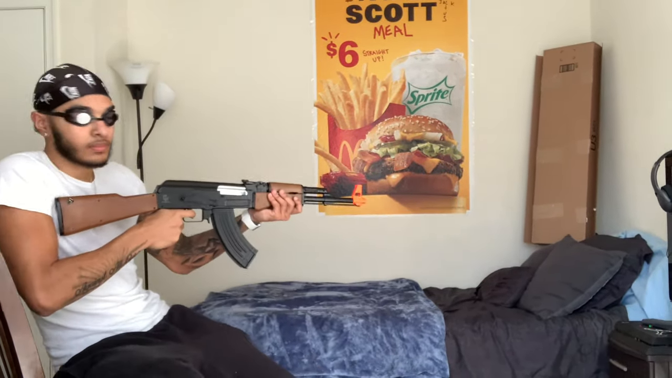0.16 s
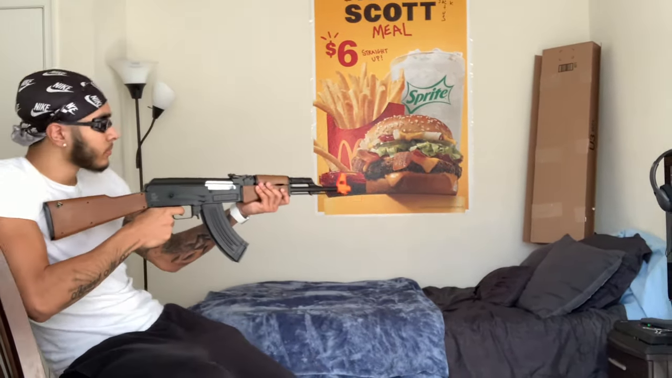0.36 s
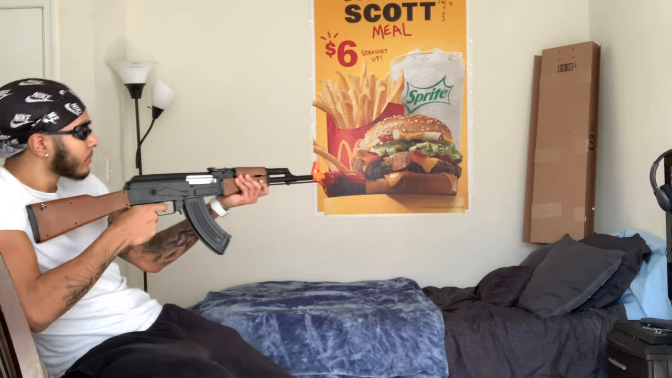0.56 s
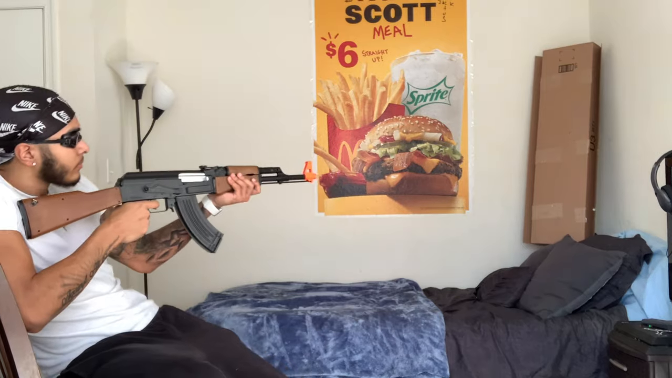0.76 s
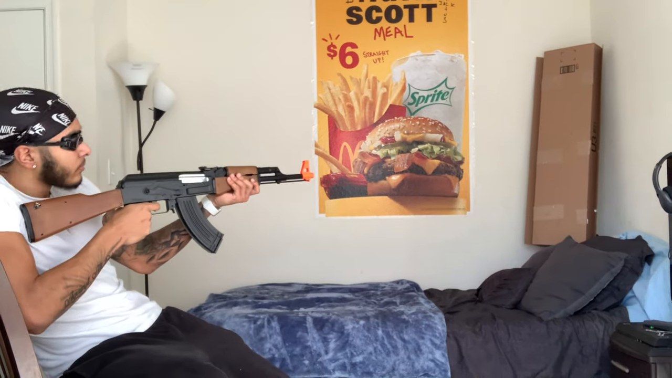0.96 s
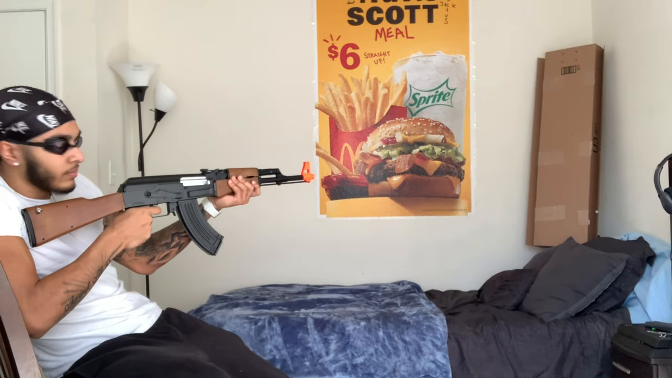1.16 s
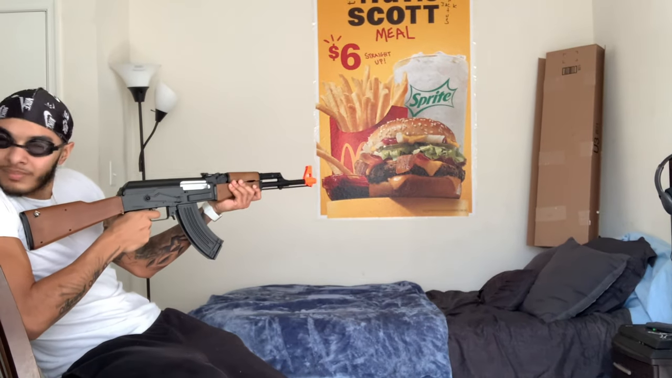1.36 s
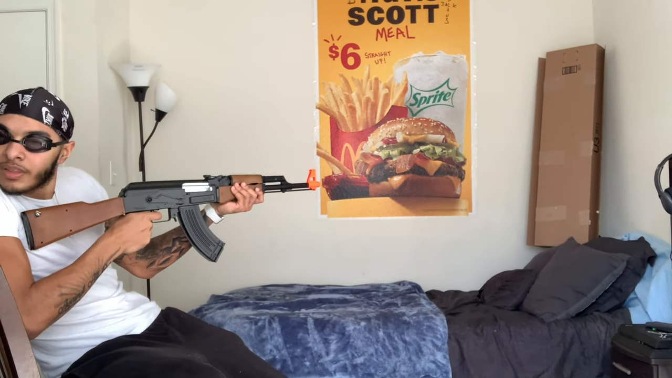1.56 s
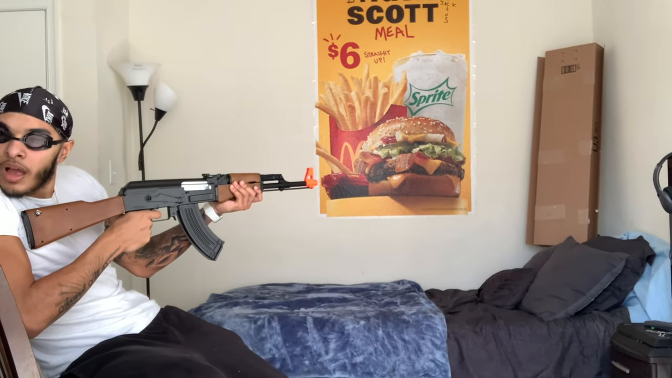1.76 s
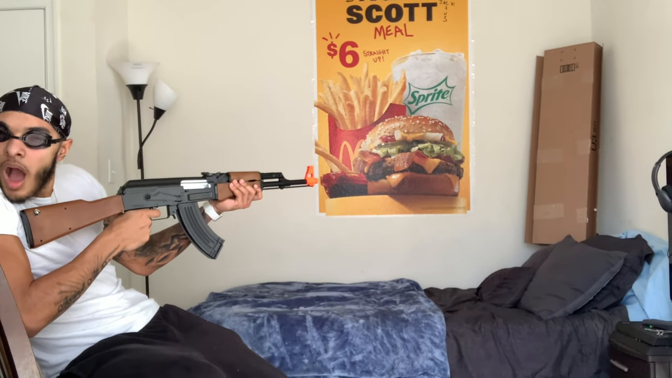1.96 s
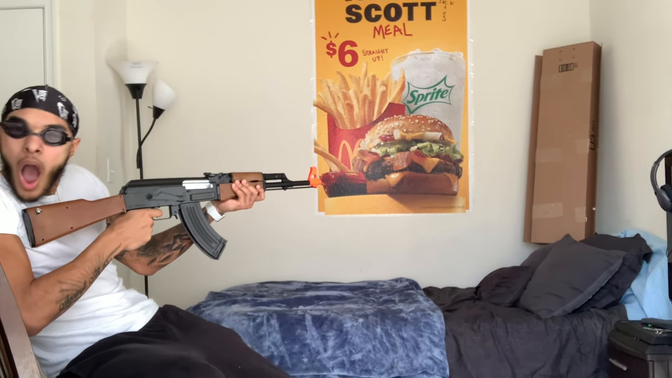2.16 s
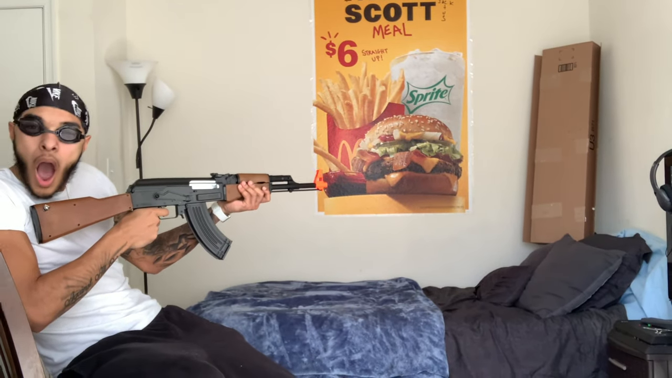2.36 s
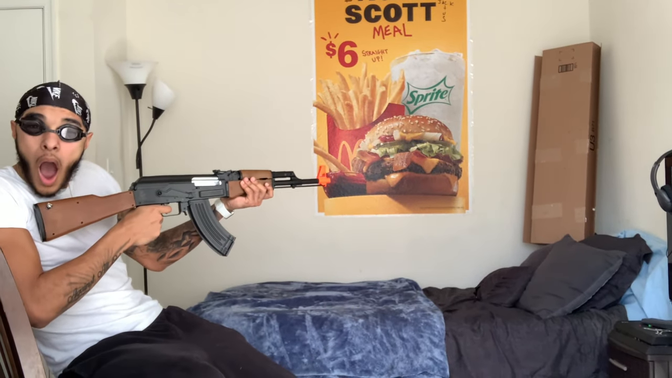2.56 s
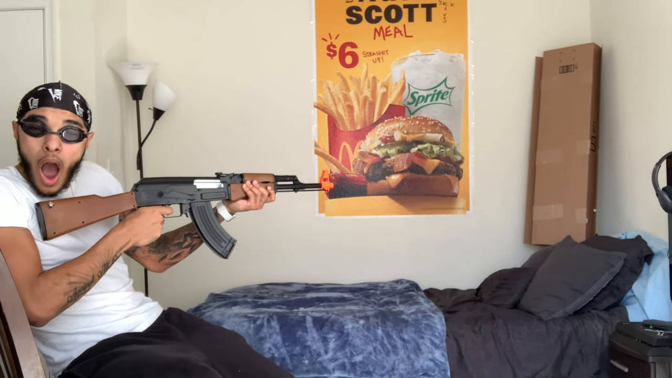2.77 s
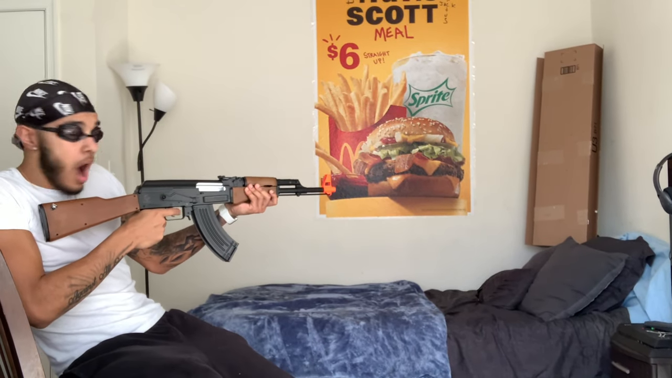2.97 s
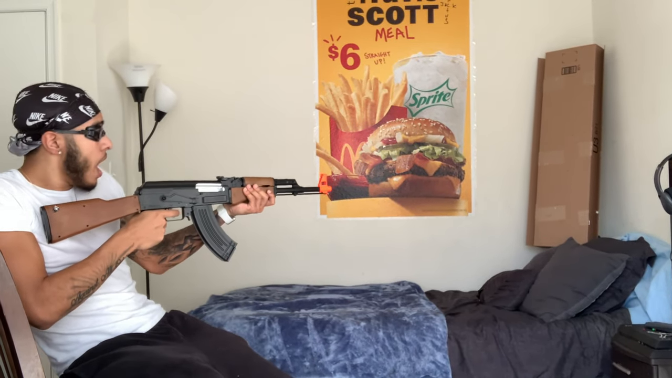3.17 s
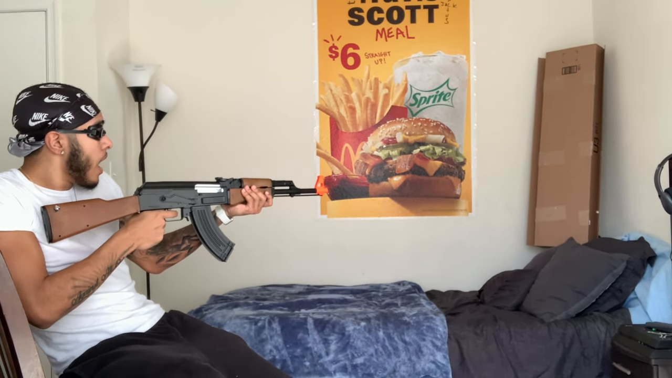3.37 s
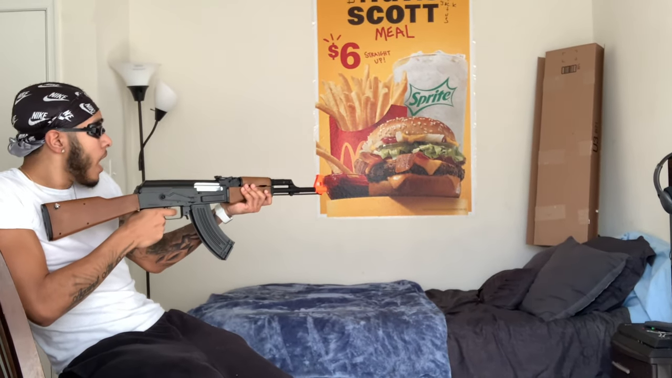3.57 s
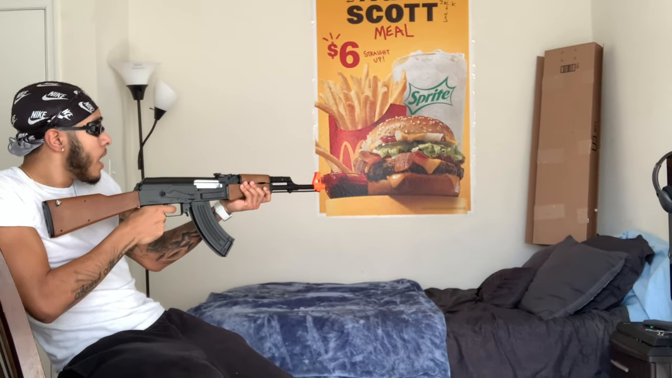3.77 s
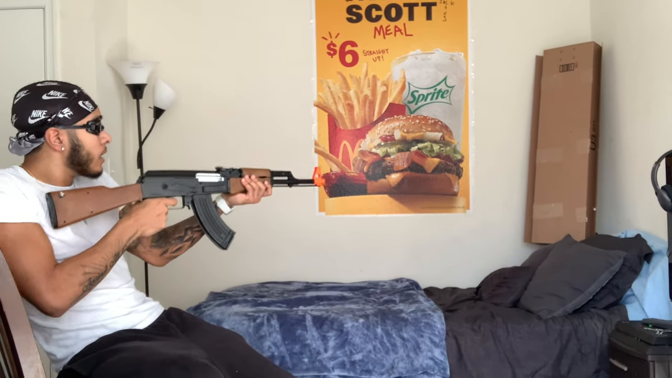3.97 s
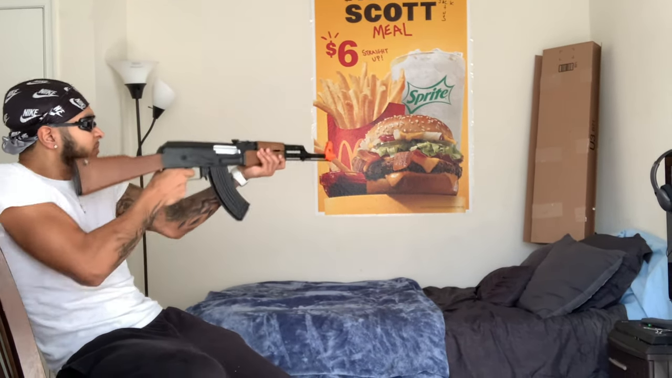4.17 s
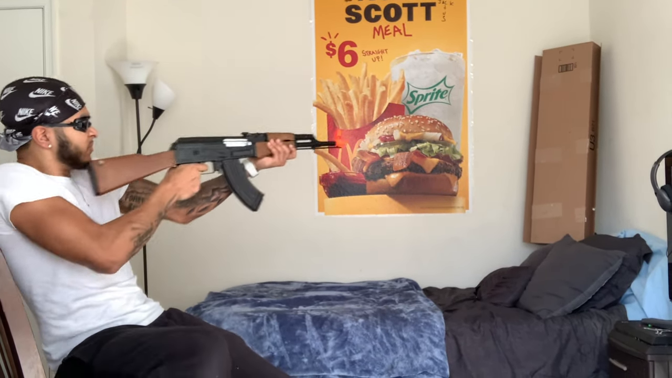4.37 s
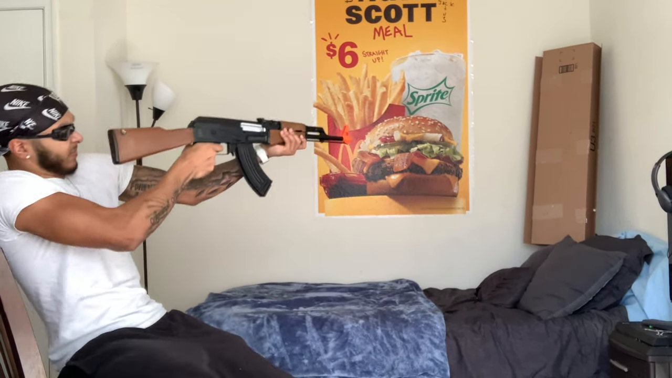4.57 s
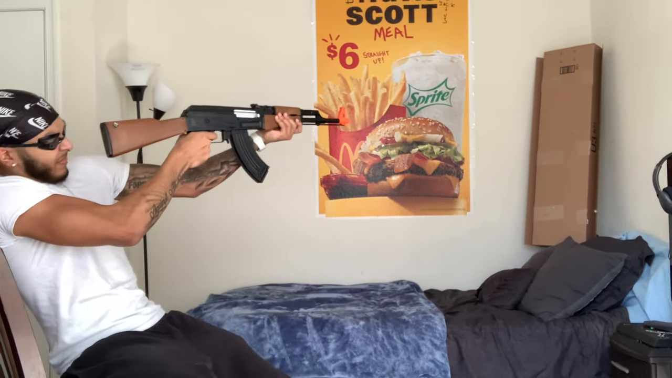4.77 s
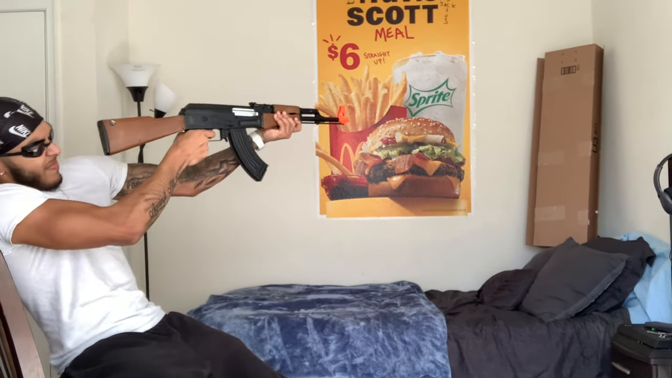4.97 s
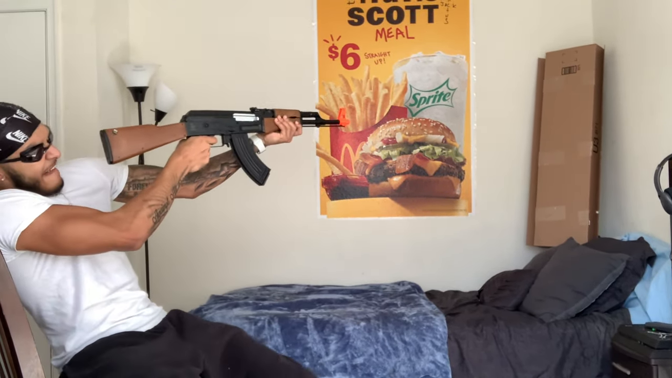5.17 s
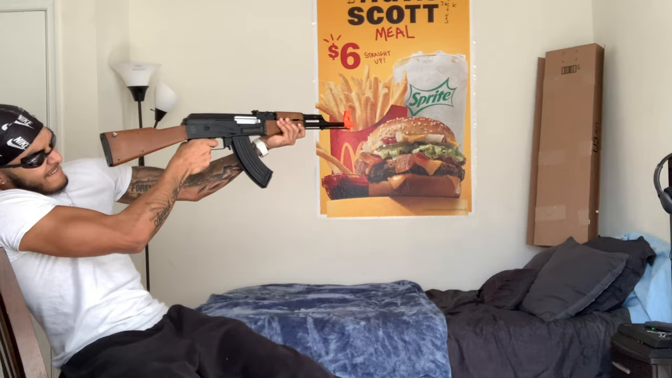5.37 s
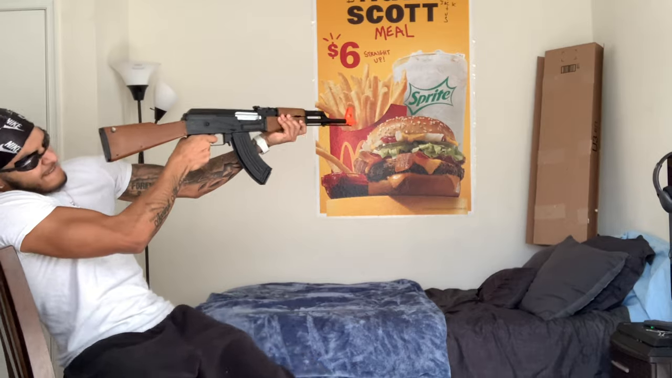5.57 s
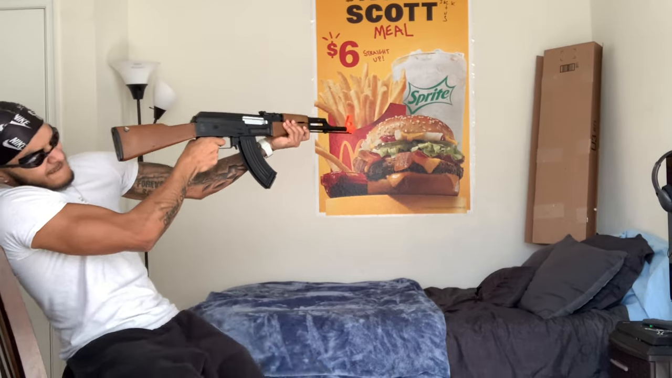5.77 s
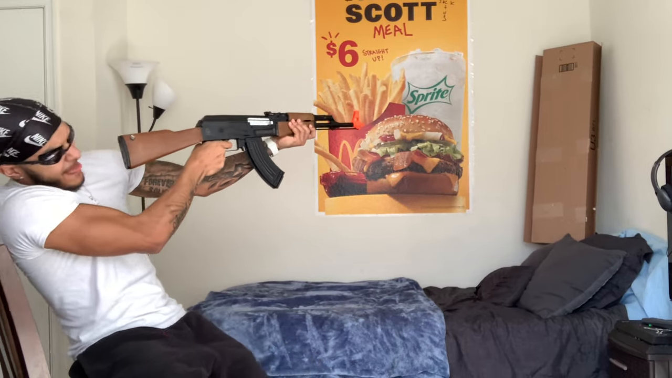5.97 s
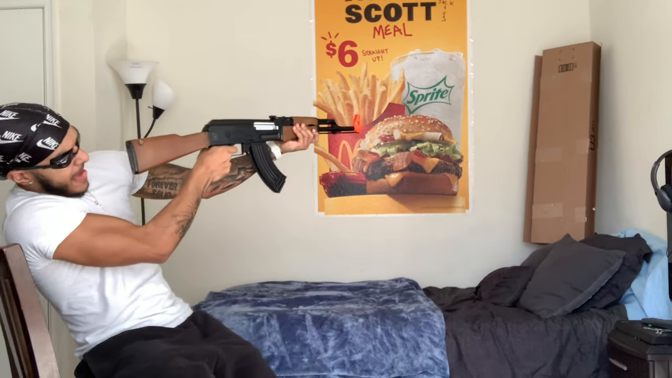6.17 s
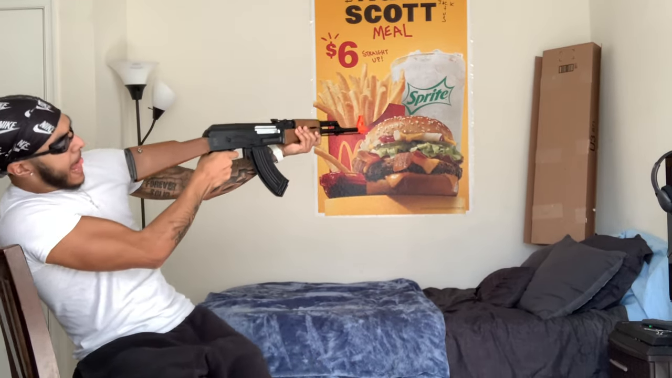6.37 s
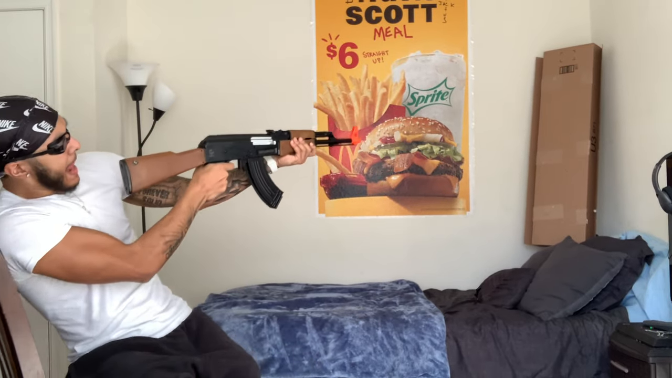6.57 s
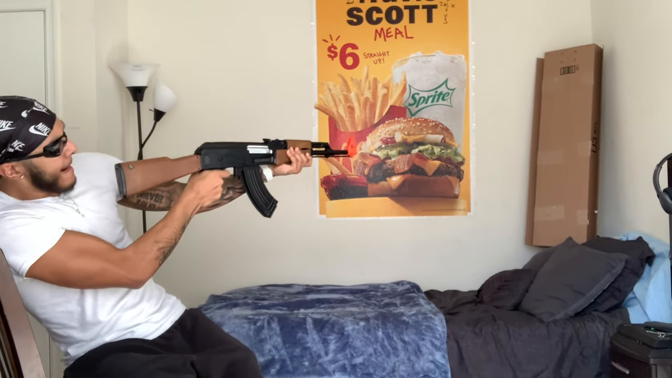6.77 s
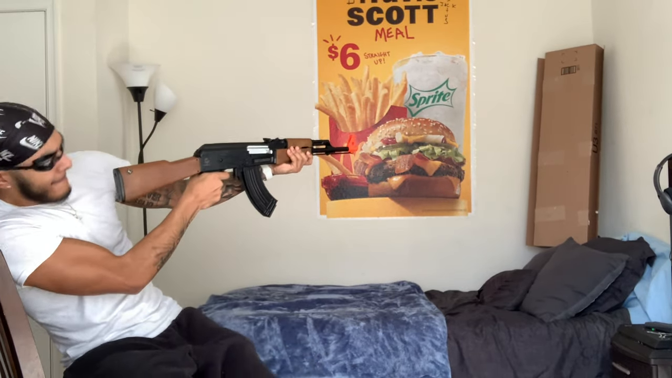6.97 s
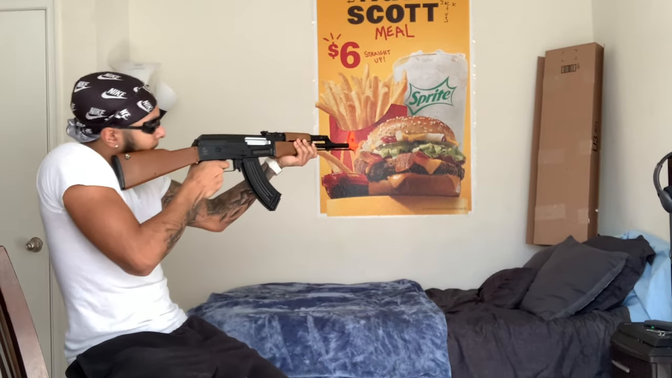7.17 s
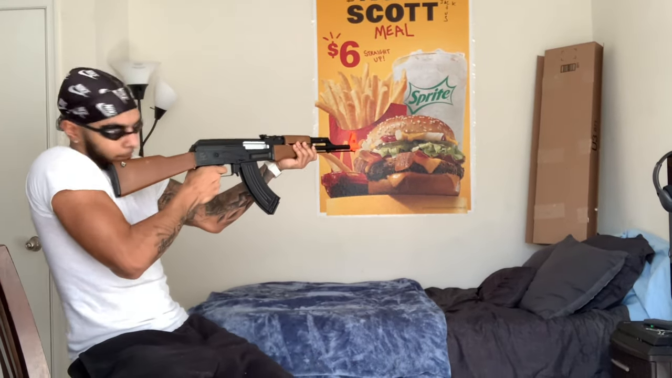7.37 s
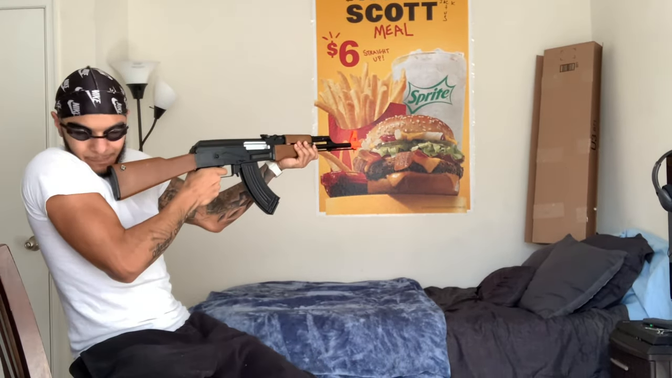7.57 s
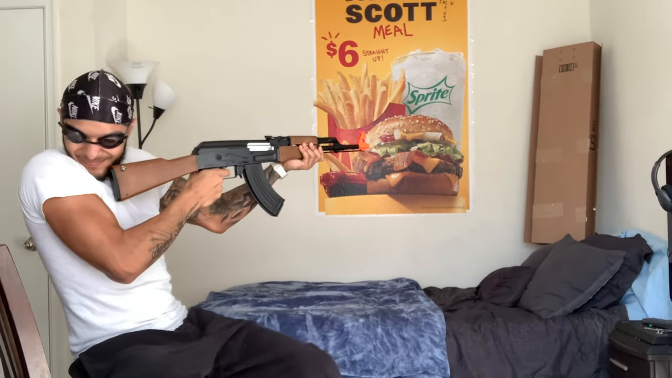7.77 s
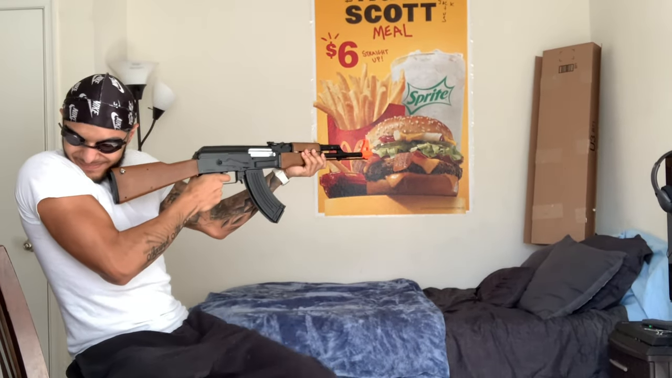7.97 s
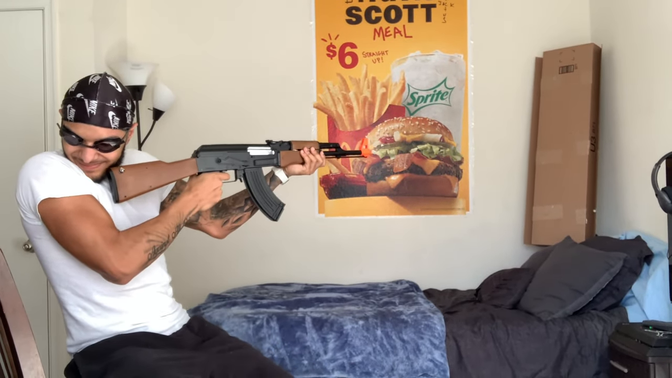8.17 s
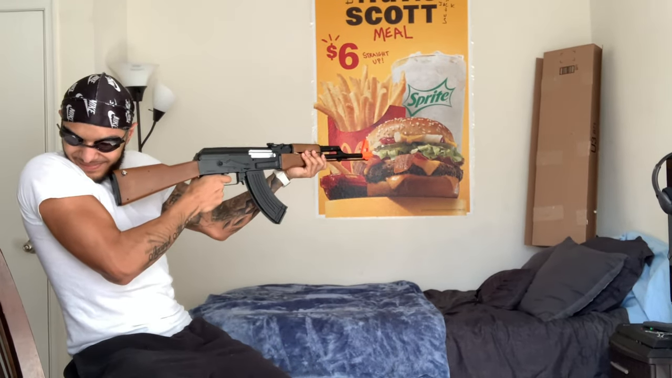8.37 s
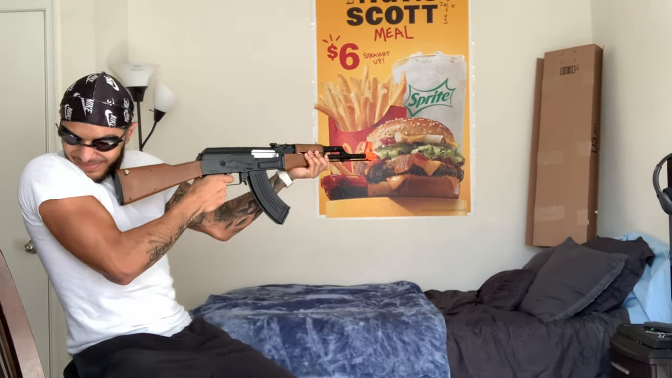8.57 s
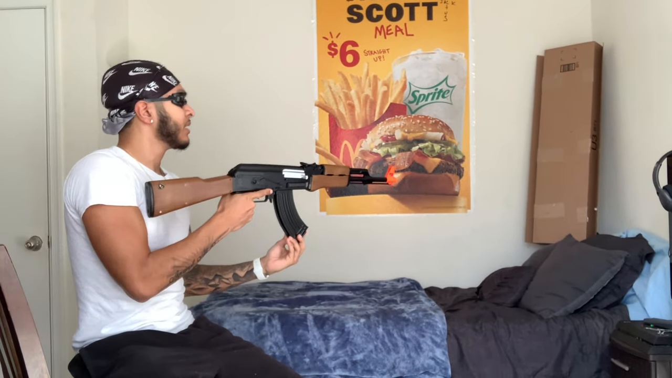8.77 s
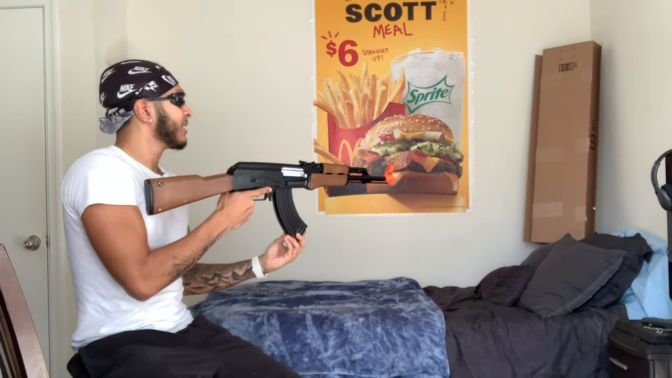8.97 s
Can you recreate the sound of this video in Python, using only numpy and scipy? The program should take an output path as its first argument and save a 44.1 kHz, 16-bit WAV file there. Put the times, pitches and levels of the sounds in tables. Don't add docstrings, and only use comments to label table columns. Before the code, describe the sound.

In a small bedroom, faint hum and cloth rustle precede a soft bump, then an electric toy rifle rattles off a two-second burst. Pellets smack a hollow cardboard box, then the last shots miss into bedding. After a hard knock and shuffling, a second longer burst hits the box, turns to sharper dry cracks, and a third follows at once until abruptly cut. Close stereo microphone, short room echo.

```python
import sys
import numpy as np
from scipy import signal
from scipy.fft import rfft, irfft, next_fast_len
from scipy.io import wavfile
from scipy.ndimage import uniform_filter1d, minimum_filter1d

SR = 44100
rng = np.random.default_rng(int(sys.argv[2]) if len(sys.argv) > 2 else 0)


def invert_db(level):
    return 10 ** (np.asarray(level, dtype=float) / 20)


def master(y):
    cut = np.clip(np.atleast_2d(y).T, -1, 1)
    pcm = np.round(cut * 32767)
    wavfile.write(sys.argv[1], SR, pcm.astype(np.int16))


N = 398223

WHIRR_FED_DB = -33

# start_s, cycle_s, slowing_s (per shot squared), fed_crack_db, dry_crack_db
BURSTS = [
    (.9962, .09652, 0.00014, -18.5, -14),
    (4.1044, .09901, .000066, -20, -12),
    (7.1092, .0991, .00011, -17.5, -10.5),
]
FEED = ["oooooooooooooxxxxxxx", "oo-oooooo-oo--o-o----o--------", "ooooooo-o-------"]


def shots():
    rows = []
    for (start, cycle, slowing, fed_db, dry_db), feed in zip(BURSTS, FEED):
        crack_db = {"-": dry_db, "o": fed_db, "x": fed_db - 1.5}
        whirr_db = {"-": -38, "o": WHIRR_FED_DB, "x": -40}
        for k, kind in enumerate(feed):
            first = k == 0
            s = start + cycle * k + slowing * k * k - 0.0075 * first
            s -= 0.0026 * (kind == "x") + 0.0005 * feed[:k].count("x")
            rows.append((s, crack_db[kind] + 2.5 * first, kind == "-", whirr_db[kind]))
    return np.transpose(rows)


# freq_hz, gain_db
CRACK = [(200, -61.5), (600, -9), (2000, 2), (3500, -4.5), (6000, -1), (9000, 1), (12000, 0), (15500, -6)]
# freq_hz, width_hz, gain_db
RECEIVER = [(702, 43, 0.5), (984, 37, 0.5), (1370, 200, -4.5), (1787, 49, 4.5), (2180, 100, -9),
            (3000, 130, -2.5), (3430, 360, -7)]
# freq_hz, width_hz, gain_db
PISTON_HEAD = [(3370, 950, 0), (4360, 440, 1.5), (7400, 1900, -3.5), (12500, 6000, 1)]


def piston():
    s, db = shots()[:2]
    db = db + 1.2 * rng.standard_normal(len(s))
    slam = bursts(s, db, t60=0.021, same=0.45, rise=0.0014)
    latch = bursts(s - 0.018, db - 11.5, t60=0.018, same=0.6)
    crack = slam + latch
    rattle = bursts(s + 0.001, db - 4, t60=0.045, same=0.33, grit_db=3.0, rise=0.0018)
    head = filtered(bursts(s, db + 9.5, t60=0.0045, same=0.6), modes(PISTON_HEAD))
    delayed = invert_db(6.5) * np.roll(crack, shift=70)
    ring = filtered(delayed, lambda hz: modes(RECEIVER)(hz) * above(200)(hz))
    return head + filtered(crack + rattle, colour(CRACK)) + ring


def whirr_contour():
    s, _, _, db = shots()
    pulls = []
    for part in np.split(np.arange(len(s)), [len(FEED[0])]):
        start = s[part[0]]
        run_up = [(start, WHIRR_FED_DB - 29.5), (start + 0.13, WHIRR_FED_DB)]
        pulls.append(run_up + list(zip(s[part[2:]], db[part[2:]])))
    return curves(pulls)[0]


# freq_hz, gain_db
WHIRR = [(60, -62), (130, -9.5), (300, -4.5), (700, -1.5), (1500, -2.5), (3500, -5.5), (6500, -8),
         (10000, -7.5), (15500, -10.5)]
# time_s, whirr_db, whine_hz, whine_db
SPIN = [
    [(.89, -82.5, 494, -94.5), (.93, -55.5, 1014, -79), (.96, -32.5, 1400, -56.5),
     (1.0, -32.5, 1478, -41.5), (2.88, -36, 1444, -59.5), (2.96, -48.5, 1270, -69), (3.04, -59, 880, -73)],
    [(4.0, -63, 598.3, -92), (4.02, -61, 798, -53), (4.038, -56, 1343, -54), (4.06, -49.5, 1592, -47),
     (4.1, -29.5, 1640, -49), (4.3, -39, 1440, -56), (8.7, -39, 1440, -63)],
]
# freq_hz, width_hz, gain_db
HOUSING = [(1610, 200, -3), (2500, 1800, 1)]


def gears():
    shot_s = shots()[0]
    turn = np.interp(np.arange(N) / SR, shot_s, np.arange(len(shot_s)))
    teeth = invert_db(np.cos(2 * np.pi * 22 * turn) + 1.1 * (turn % 1))
    grit = invert_db(5.3 * unit(uniform_filter1d(rng.standard_normal(N), 60)))
    whirr = filtered(unit(teeth * grit) * rng.standard_normal(N), colour(WHIRR))
    spin_db, whine_hz, whine_db = curves(SPIN)
    flutter = 1 + 0.03 * unit(uniform_filter1d(rng.standard_normal(N), 400))
    phase = 2 * np.pi * np.cumsum(whine_hz * flutter) / SR
    whine = invert_db(whine_db) * grit * (np.sin(phase) + 1.1 * np.sin(2 * phase))
    whirr_gain = invert_db(np.maximum(whirr_contour() - 2.5, spin_db))
    return whirr_gain * unit(whirr) + filtered(whine, modes(HOUSING))


# freq_hz, width_hz, gain_db
MUZZLE = [(137.4, 53, 2), (186, 76, 1), (302.4, 38, 2), (404, 55, 1)]
# freq_hz, width_hz, gain_db
BARREL = [(500, 200, -5), (712, 120, 1.5)]


def muzzle():
    s, crack_db, dry, _ = shots()
    chance = rng.standard_normal((len(s), 3))
    db = crack_db + np.where(dry, -13.5, -7.5) + 12.5 + 0.8 * chance[:, 0]
    low = -pushes(s + 0.0043, db, size=40)
    low += bursts(s + 0.00509, db - 1.5, t60=0.25, same=0.45, rise=0.002)
    bright_db = db + np.where(dry, -2.5, -8) + 1.5 * chance[:, 1]
    bright = -pushes(s + 0.0071 + 0.00078 * chance[:, 2], bright_db - 3, size=40)
    bright += bursts(s + 0.005, bright_db + 1, t60=0.25, same=0.43, rise=0.002)
    low = filtered(low, lambda hz: modes(MUZZLE)(hz) * above(82)(hz) / (1 + (hz / 1200) ** 4))
    return low + filtered(bright, lambda hz: modes(BARREL)(hz) / (1 + (hz / 1300) ** 4))


# time_s, snap_peak_db, hollow_db (over snap), panel_db (over
# snap), drum_hz
HITS = [(1.0292, -9, -6, -4, 400), (1.132, -7, -8.5, -8.5, 414), (1.228, -13.5, -5.5, -2, 403),
        (1.3264, -14, -4, -5.5, 516), (1.4223, -6.5, -10, -9, 509), (1.5199, -7.5, -15, -17.5, 398),
        (1.62, -8.5, -12, -13.5, 399), (1.717, -11, -6.5, -8.5, 500), (1.8139, -8, -10.5, -10, 503),
        (1.9129, -12, -7.5, -10.5, 500), (2.0118, -9, -10, -7, 427), (2.1103, -10.5, -16, -8, 460),
        (2.2083, -9, -18.5, -7.5, 404),
        (4.132, -10, -6.5, -4, 401), (4.2354, -7, -9, -7, 407), (4.4344, -13.5, -9.5, -2.5, 404),
          (4.5336, -9, -9, -8.5, 403), (4.6333, -11.5, -4.5, -7, 407), (4.734, -11.5, -5.5, -12.5, 416.3),
          (4.8351, -12.5, -4.5, -16, 405), (4.9362, -8.5, -6.5, -14, 414),
          (5.136, -11.5, -4.5, -14.5, 402.4), (5.236, -9, -10.5, -6.5, 530),
          (5.5387, -12, -13.5, -17.5, 484), (5.7391, -14.5, -2.5, -4, 412), (6.2487, -12.5, -8, -3.5, 528),
        (7.1372, -12.5, -4, -5.5, 413), (7.2408, -9.5, -5, -5, 409), (7.3409, -11, -11, -2, 404),
          (7.4449, -10.5, -9.5, -12, 410), (7.5413, -10, -7.5, -5.5, 504), (7.642, -9.5, -18, -15, 484)]
# freq_hz, gain_db
SNAP = [(200, -63), (600, -6.5), (2000, 1), (4500, -8.5), (7000, -13.5), (10500, -9.5), (13000, -13),
        (15500, -8)]
# freq_hz, width_hz, gain_db
FLAPS = [(940, 58, -3), (1400, 220, 2.5), (2140, 350, -5), (2530, 220, -1), (3490, 1000, -5)]
HOLLOW = [(98, 43, -2.5), (211.4, 180, -3.5), (298.2, 24, 4.5), (473, 120, 3.5), (1385, 140, -5.5)]
PANEL = [(614, 49, -4.5), (727, 120, -1), (867, 67, 0)]


def box():
    s, db, boom_db, panel_db, drum_hz = np.transpose(HITS)
    snap = bursts(s, db + 8.3, t60=0.018, same=0, grit_db=2, rise=0.0013)
    snap += bursts(s + 0.002, db - 1, t60=0.051, same=0, grit_db=5, rise=0.0025)
    slap_db = -0.5 + 0.35 * (db + panel_db + 19) + 1.6 * rng.standard_normal(len(s))
    slap = bursts(s, slap_db, t60=0.025, same=0.35, grit_db=2.5, rise=0.0016)
    bright = filtered(snap, colour(SNAP)) + filtered(slap, modes(FLAPS))

    def shake(level_db):
        push = pushes(s + 0.001, level_db + 16.5, size=24)
        return push + bursts(s + 0.00198, level_db + 16.5, t60=0.12, same=0)

    hollow = filtered(shake(db + boom_db - 6.5), lambda hz: modes(HOLLOW)(hz) * above(80)(hz))
    panel = filtered(shake(db + panel_db), lambda hz: modes(PANEL)(hz) * above(300)(hz))
    t = np.arange(6000) / SR
    swell = invert_db(-60 * t / 0.14) * (1 - np.exp(-t / 0.0085))
    rows = invert_db(db + boom_db + 1.5)[:, None] * swell * np.sin(2 * np.pi * np.outer(drum_hz, t))
    at = np.round(s * SR).astype(int)[:, None] + np.arange(len(t))
    drum = np.bincount(at.ravel(), rows.ravel(), N)
    return bright, hollow + panel, drum


# time_s, peak_db, ring_hz, ring_t60_s, wet_db
TICKS = [(0.299, -53, 2030, 0.06, -10), (0.302, -58, 3220, 0.03, -8), (0.673, -55, 3000, .02, -5),
         (0.947, -33.5, 796, 0.021, -15.5), (0.966, -17, 1720, 0.029, -19),
         (2.308, -17, 2160, 0.013, -16.5), (2.41, -17.5, 3240, 0.013, -16), (2.504, -17, 3520, 0.02, -4),
         (2.604, -21, 3590, 0.02, 0), (2.703, -24, 3500, .015, -12), (2.771, -17, 1200, 0.025, -5),
         (2.803, -16, 3500, 0.019, -6), (2.864, -16.5, 3200, 0.036, -8), (2.903, -16, 3510, 0.013, 1.5),
         (3.044, -15, 1300, 0.032, -4), (3.045, -17, 4900, 0.025, -9), (3.601, -28, 2600, 0.03, -16),
         (3.603, -26, 3920, 0.034, -16), (3.604, -29, 5100, 0.025, -19.5), (3.619, -13.5, 6170, 0.018, -11),
         (3.649, -28, 2020, 0.036, -11), (3.675, -27, 2690, 0.027, -9), (3.976, -35, 1860, 0.027, -3),
         (4.02, -38, 1920, 0.021, -5.5), (4.074, -20.5, 1860, 0.042, -19.5),
         (6.193, -27.5, 1720, 0.025, -23), (7.755, -21, 2980, 0.03, -2), (7.958, -15, 5900, 0.017, -17.5),
         (7.968, -13, 1370, 0.06, -6.5), (8.09, -17.5, 3850, 0.01, -18)]


def ticks():
    dry, wet = np.zeros((2, N + SR))
    t = np.arange(4096) / SR
    for s, db, hz, t60, wet_db in TICKS:
        click = invert_db(db - 60 * t / t60) * (1 - np.exp(-t / 0.00056)) * rng.standard_normal(len(t))
        ring = invert_db(db - 10.0 - 60 * t / t60) * np.sin(2 * np.pi * hz * t)
        at = round(s * SR)
        dry[at:at + len(t)] += 0.45 * click + ring
        wet[at:at + len(t)] += invert_db(wet_db) * click
    return dry[:N], wet[:N]


# time_s, level_db, brightness_db
KNOCKS = [
    (.574, -33, -22),
    (.987, -23.5, -28),
    (3.177, -27, -7.5),
]
# freq_hz, width_hz, gain_db
STOCK = [(238, 120, -9.5), (380, 150, -5), (520, 63, -1.5), (820, 270, -5.5), (1400, 340, -7.5),
         (1800, 80, -7), (2290, 2100, -5)]
BUZZ = [(377, 90, -12), (843, 50, -3), (1380, 130, 0), (1815, 80, -3.5), (2380, 180, -5)]


def stock():
    s, db, bright_db = np.transpose(KNOCKS)
    hard = bursts(s, db + bright_db, t60=0.05, same=0)
    soft = filtered(bursts(s, db + 17.5, t60=0.11, same=0), lambda hz: 1 / (1 + (hz / 900) ** 6))
    since = np.arange(N) / SR - s[-1]
    decay = (since > 0) * invert_db(-45 - 60 * np.abs(since) / 0.55)
    buzz = decay * unit(filtered(rng.standard_normal(N), lambda hz: modes(BUZZ)(hz) ** 2))
    return filtered(soft + invert_db(19.5) * hard, modes(STOCK)) + 0.53 * hard + buzz


# peak_s, level_db, rise_s, t60_s, smoothness_db (more hiss, less creak)
STROKES = [(.24, -76, 0.074, .3, -24), (.31, -65, 0.037, 0.4, -15), (.45, -75.5, .2, .6, -12),
           (.58, -56, 0.033, 0.4, -14), (0.676, -60.5, 0.033, 0.27, -6), (.9, -64, 0.0195, .2, 12),
           (3.1, -31.5, .14, 0.41, 9.5), (3.18, -36, .015, 0.44, -16), (3.62, -36.5, 0.025, 0.23, -1.5),
           (3.65, -44, 0.021, 0.32, 11), (3.98, -49, 0.016, 0.27, 3), (8.69, -66, .02, 0.69, 19),
           (8.766, -65.5, 0.18, 0.26, -16), (8.956, -72, .02, .1, 3), (9.01, -65, 0.014, .9, 6.5)]
# peak_s, level_db, rise_s, t60_s
SHIFTS = [(.3, -68, 0.092, 0.55), (.576, -45, .015, 0.24), (3.18, -32, 0.011, 0.4), (3.53, -57, .1, .3),
          (3.625, -40.5, 0.024, 0.31), (3.9, -63.5, 0.05, .2), (8.68, -69.5, .02, 0.34)]
# peak_s, level_db, rise_s, t60_s
GROANS = [(3.53, -66, .04, .25), (3.775, -66, .02, .15), (3.896, -54, 0.031, .13), (3.944, -68, 0.032, .04)]
# freq_hz, gain_db
CLOTH = [(1200, -10.5), (2800, 1.5), (5000, 2), (9000, -6), (15500, -44)]
# freq_hz, width_hz, gain_db
FRAME = [(506, 45, -1.5), (880, 70, -9.5), (1180, 90, -13)]


def rustle():
    s, db, rise, t60, smooth_db = np.transpose(STROKES)
    rest_db = -91.5
    crumbs = invert_db(1.7 * unit(uniform_filter1d(rng.standard_normal((2, N)), 250)))

    def stroke(response):
        return unit(filtered(crumbs * rng.standard_normal((2, N)), response))

    low = stroke(lambda hz: modes([(270, 170, -5), (540, 350, 0), (950, 450, -3)])(hz) ** 2)
    hiss = stroke(lambda hz: modes([(12000, 6000, 0)])(hz) ** 2)
    creak = stroke(modes([(1400, 300, -11), (1940, 60, -0.5), (2150, 60, -5)]))
    groan = stroke(lambda hz: modes(FRAME)(hz) ** 2)
    parts = swells(s, db, rise, t60, rest_db) * stroke(colour(CLOTH))
    parts += swells(*np.transpose(SHIFTS), -82.5) * low
    parts += swells(s, db + smooth_db - 4.5, rise, 0.41 * t60, rest_db - 21.5) * hiss
    parts += swells(s, db - 5 - 0.62 * smooth_db, rise, t60, rest_db + 3) * creak
    parts += swells(*np.transpose(GROANS), rest_db - 15.5) * groan
    return diffuse(parts)


# freq_hz, level_db
HUM = [(58, -52), (111, -60.5), (166, -86.5)]
# freq_hz, density_db (per Hz)
AIR = [(15, -33), (25, -9), (95, -7.5), (147, -12), (193, -19), (630, -33), (1910, -48.5), (6070, -53.5),
       (9000, -65.5), (11700, -102), (19800, -120)]
# time_s, gain_db
DUCK = [(0, 2.5), (2.8, 2.5), (3.2, -5), (3.7, -0.5), (8.6, -0.5), (9.03, -1.5)]


def floor():
    t = np.arange(N) / SR

    def drift(size):
        return unit(uniform_filter1d(uniform_filter1d(rng.standard_normal(N), size), size))

    hum = np.zeros(N)
    for hz, db in HUM:
        swell_db, slip = 1.8 * drift(3000), 0.5 * drift(6000)
        hum += invert_db(db + swell_db) * np.sin(2 * np.pi * hz * t + slip)
    air = diffuse(invert_db(-61) * unit(filtered(rng.standard_normal((2, N)), colour(AIR))))
    return invert_db(np.interp(t, *np.transpose(DUCK))) * (0.87 * hum + air)


# freq_hz, t60_s
WALLS = [(120, 0.65), (400, 0.38), (1500, 0.34), (5000, 0.29), (13000, 0.19)]


def room(x, count):
    wet, phase = np.zeros((2, N)), np.arange(N) / SR / 0.7
    for k in range(count):
        hz, t, z = signal.stft(rng.standard_normal((2, SR // 2)), SR, nperseg=256)
        decay = invert_db(-60 * t / along(WALLS, hz)[:, None])
        tail = signal.istft(z * decay, SR, nperseg=256)[1]
        tail /= np.linalg.norm(tail[0])
        share = np.sqrt(2 / count) * np.cos(np.pi * (phase + k / count)) if count > 1 else 1
        late = np.pad(share * x, (120, 0))[None]
        wet += signal.fftconvolve(late, tail, axes=1)[:, :N]
    return diffuse(wet)


# freq_hz, correlation
ALIKE = [(60, 0.78), (200, 0.88), (500, -0.43), (6000, 0.037), (7600, -0.5), (8300, 0.026), (9800, -0.59),
         (11000, -0.3), (12800, 0.31)]


def diffuse(pair):
    def shares(hz):
        turn = np.arccos(np.clip(along(ALIKE, hz), -1, 1)) / 2
        return np.array([np.cos(turn), np.sin(turn)])

    mid, side = filtered(pair, shares)
    return np.array([mid + side, mid - side])


def ports(x, lead):
    return filtered(x, lambda hz: np.exp(0.5j * np.outer([1, -1], along(lead, hz))))


def bursts(times, db, t60, same, grit_db=0, rise=0.00022):
    t = np.arange(2048) / SR
    same = np.clip(same, 0, 1)
    common = rng.standard_normal(len(t))
    noise = same * common + np.sqrt(1 - same ** 2) * rng.standard_normal((len(times), len(t)))
    crumbs = unit(invert_db(grit_db * rng.standard_normal((len(times), len(t) // 32)))).repeat(32, 1)
    decay = invert_db(db[:, None] - 60 * t / t60)
    rows = decay * (1 - np.exp(-t / rise)) * (1 - (t / t[-1]) ** 6) * noise * crumbs
    at = np.round(times * SR).astype(int)[:, None] + np.arange(len(t))
    return np.bincount(at.ravel(), rows.ravel(), N + SR)[:N]


# delay_s, gain_db
NEAR = [
    (.0045, -4.5),
    (.016, -10),
    (.027, -6.5),
]


def pushes(times, db, size):
    out = np.zeros(N + SR)
    for late, gain_db in [(0.00062, 0.027)] + NEAR:
        out += np.bincount(np.round((times + late) * SR).astype(int), invert_db(db + gain_db), N + SR)
    return np.convolve(out, np.hanning(size))[:N]


def swells(s, db, rise, t60, rest_db):
    t = np.arange(0, N, 32)[:, None] / SR
    level_db = db - np.maximum(30 * (s - t) / rise, 60 * (t - s) / t60)
    gain = np.sqrt(np.sum(invert_db(2 * level_db), axis=1) + invert_db(2 * rest_db))
    return np.interp(np.arange(N) / SR, t[:, 0], gain)


def curves(spans):
    t, out = np.arange(N) / SR, -150.
    for rows in spans:
        s, *cols = np.transpose(rows)
        out = np.where((t >= s[0]) & (t <= s[-1]), [np.interp(t, s, c) for c in cols], out)
    return out


def along(points, hz):
    f, v = np.transpose(points)
    return np.interp(np.log(hz + 1), np.log(f + 1), v)


def unit(x):
    return x / np.sqrt(np.mean(x ** 2) + 1e-20)


def filtered(x, response):
    m = next_fast_len(N + SR // 2)
    return irfft(rfft(x, m) * response(np.fft.rfftfreq(m, 1 / SR)), m)[..., :N]


def colour(points):
    return lambda hz: invert_db(along(points, hz))


def modes(rows):
    def response(f):
        total = 0
        for k, (centre, width, db) in enumerate(rows):
            damping = 1j * f * width
            total = total + (-1) ** k * invert_db(db) * damping / (centre * centre - f * f + damping)
        return total
    return response


def above(edge_hz):
    return lambda hz: (1j * hz / (edge_hz + 1j * hz)) ** 3


# freq_hz, lead_rad
FROM_GUN = [(100, 0.5), (4000, 0.5), (6000, 2), (8500, -5), (10000, 1), (12500, 9.5), (16000, -9)]
FROM_BOX = [(150, 0.5), (420, -1.08), (900, -2), (2500, -2), (4200, -6.5), (7000, -4.5), (9000, 2),
            (12500, -1), (16000, -1.5)]
# time_s, gain_db
FADE = [(0, 0), (8.661, 5.5), (8.679, -30), (8.72, -71)]


def scene():
    gun, pop = piston() + gears(), muzzle()
    target, boom, drum = box()
    bump = filtered(stock(), above(140))
    tick, tick_wet = filtered(np.array(ticks()), above(300))
    direct = ports(gun + pop + tick + bump, FROM_GUN) + ports(target + boom + drum, FROM_BOX)
    wet = room(invert_db(1.0) * gun + invert_db(3.5) * target + tick_wet + invert_db(1) * bump, count=3)
    wet += room(invert_db(-11.5) * pop + invert_db(-2.0) * boom + invert_db(-9.5) * drum, count=1)
    fade = invert_db(np.interp(np.arange(N) / SR, *np.transpose(FADE)))
    return (direct + wet) * fade + rustle() + floor()


def gated_bands(x):
    hz, t, z = signal.stft([x[0] + x[1], x[0] - x[1]], SR, nperseg=256, noverlap=192)
    level = np.sum(np.abs(z[:, hz > 5000]) ** 2, (0, 1)) + 1e-14
    before = np.roll(uniform_filter1d(level, size=9), 8)
    steady = minimum_filter1d(1. * (level < invert_db(17) * before), size=2)
    edge = rng.standard_normal((3, len(t) // 16 + 1)).repeat(16, 1)[:, :len(t)]
    f = hz[:, None]
    hole = (f > 7800 + 200 * edge[0]) & (f < 10250 + 250 * edge[1])
    z[0] *= (1 - steady * (hole | (f > 15800))) * np.where(hole, invert_db(-6), 1)
    z[1] *= 1 - steady * (f > 12200 + 250 * edge[2])
    z[1] *= np.where(f > 12200, invert_db(-9.5), 1)
    mid, side = signal.istft(z, SR, nperseg=256, noverlap=192)[1][:, :N] / 2
    return np.array([mid + side, mid - side])


def roll_off(x):
    return signal.sosfilt(signal.butter(12, 16960, fs=SR, output="sos"), x)


def record(dry):
    x = filtered(dry, lambda hz: 1 / (1 + (hz / 16300) ** 60) / (1 + (22 / (hz + 1)) ** 2))
    limited = x / (1 + np.abs(x / 1.2) ** 4) ** (1 / 4)
    return roll_off(gated_bands(limited))


dry = scene()
out = record(dry)
master(out)
```